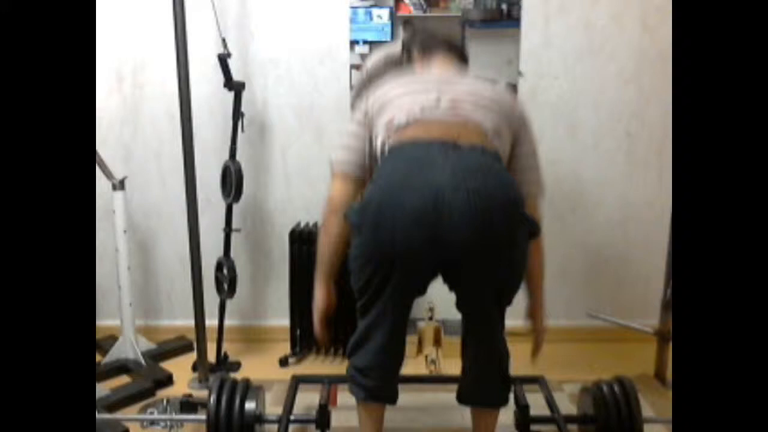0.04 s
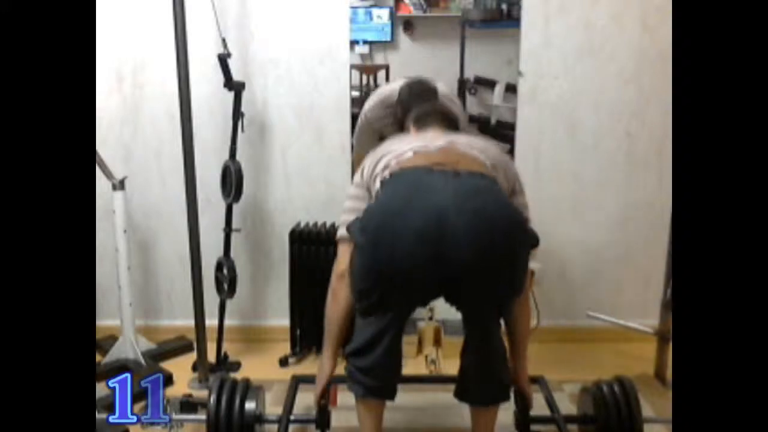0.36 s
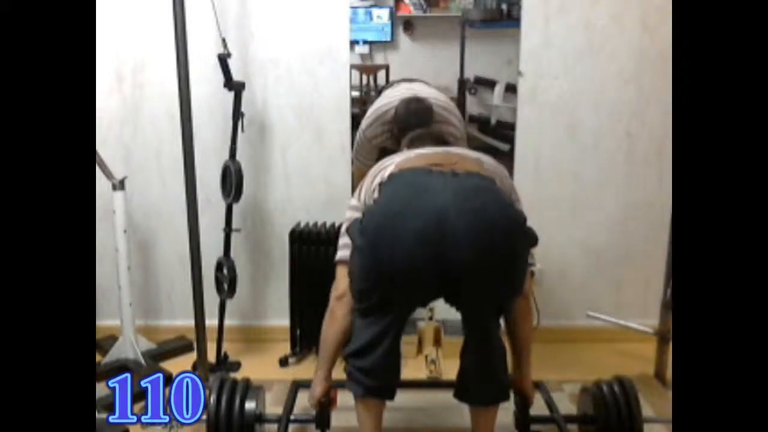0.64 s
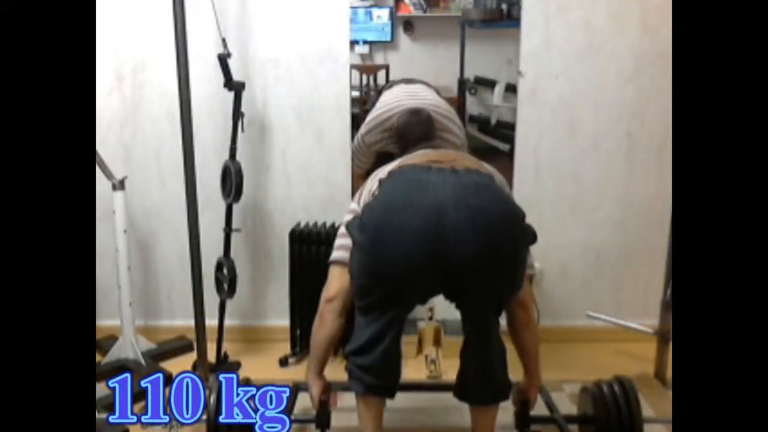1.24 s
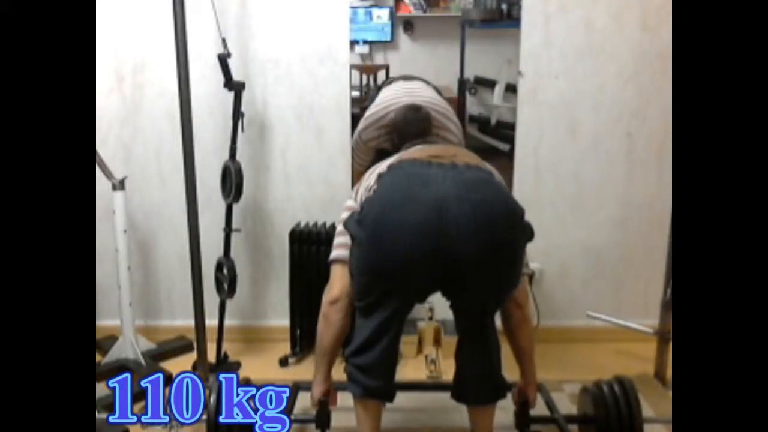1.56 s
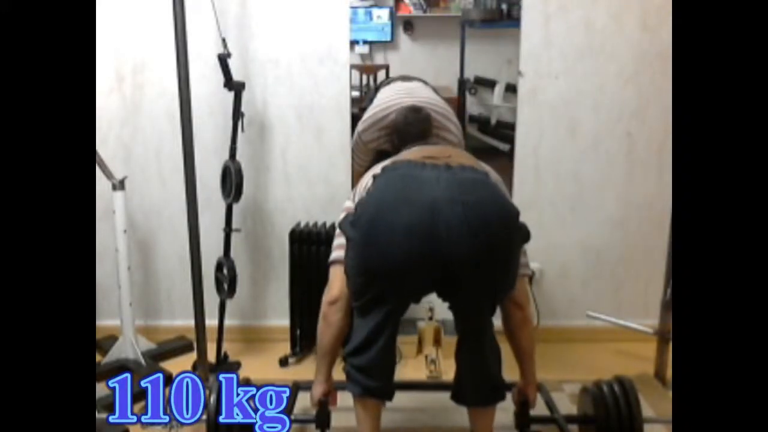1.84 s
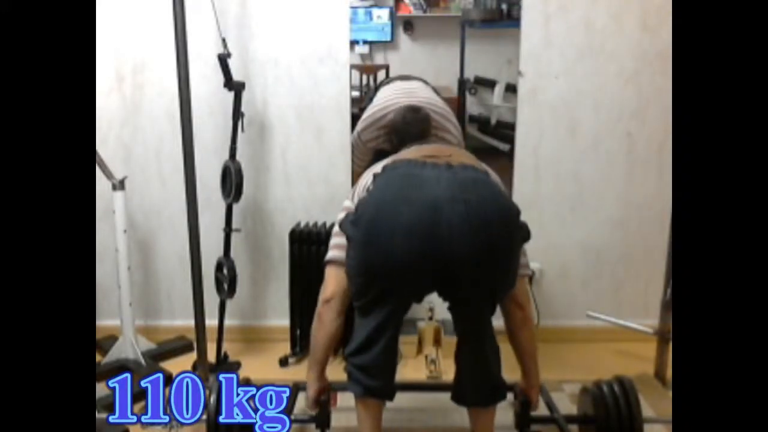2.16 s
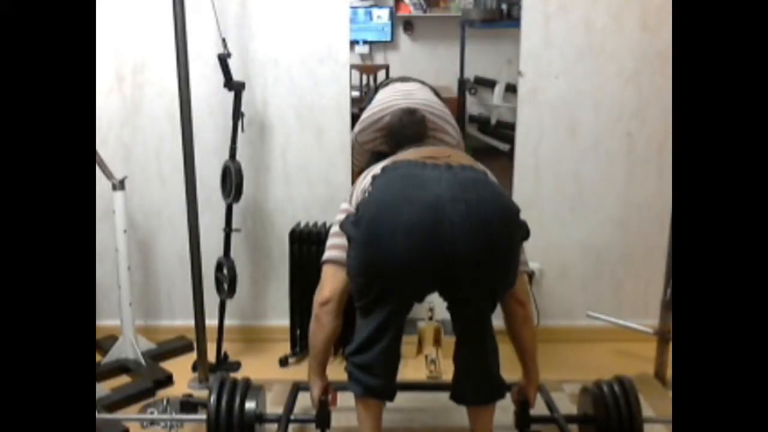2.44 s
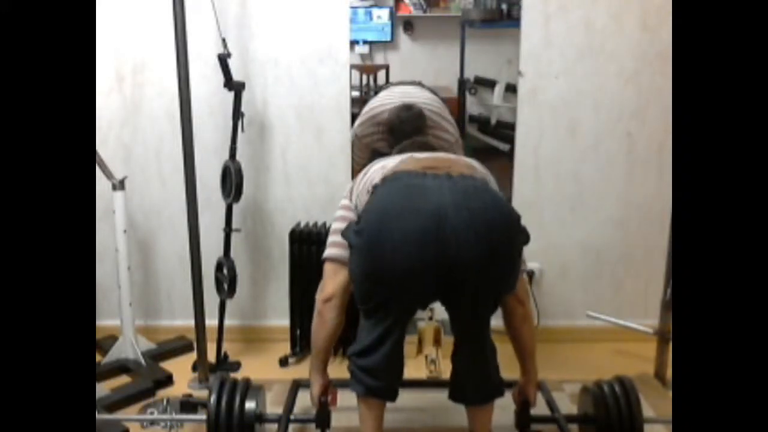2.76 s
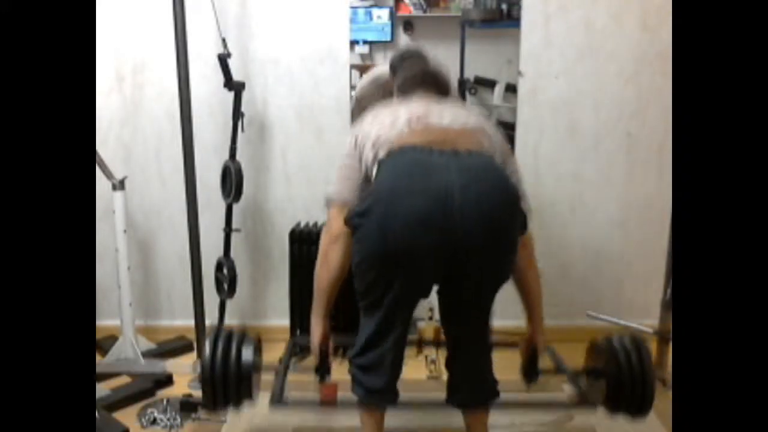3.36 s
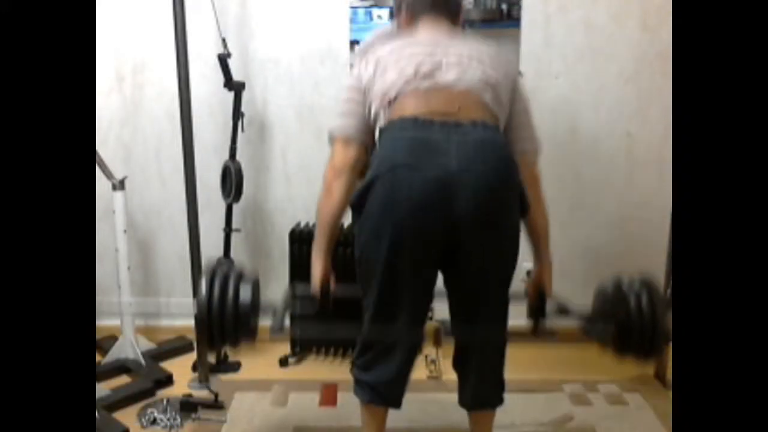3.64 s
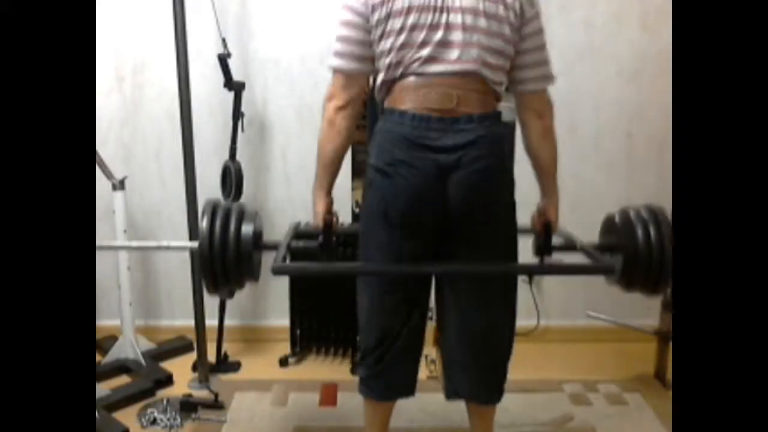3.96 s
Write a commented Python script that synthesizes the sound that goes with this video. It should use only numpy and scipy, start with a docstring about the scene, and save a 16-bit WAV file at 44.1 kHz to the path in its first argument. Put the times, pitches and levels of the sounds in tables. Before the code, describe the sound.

A heavy barbell is pulled off the floor with a sharp clang of plates and a low thud, heard from behind the lifter in a small room. Quiet shuffling and fan hum precede it; light clicks follow the fading ring.

```python
"""A loaded steel barbell is pulled off the floor of a small home gym.
The slack snaps out in one quick cluster of knocks: plates and sleeves clang,
the unloaded floor thuds, the bar rings on. Before it the lifter shuffles into place;
after it come a few small dry clicks. A fan hums throughout; a low rumble swells now and then."""
import sys
import numpy as np
from scipy import signal
from scipy.fft import rfft, irfft
from scipy.io import wavfile
from scipy.ndimage import uniform_filter1d, minimum_filter1d

SR = 44100
rng = np.random.default_rng(int(sys.argv[2]) if len(sys.argv) > 2 else 0)


def wrap_up_sound(samples):
    """Save the sound to the file named by the first command line argument, as 16-bit audio."""
    columns = np.atleast_2d(samples).T
    # keep every value between -1 and 1, then stretch to whole-number steps
    tamed = np.clip(columns, -1, 1)
    steps = np.round(tamed * 32767).astype(np.int16)
    wavfile.write(sys.argv[1], SR, steps)


N = 176400
T = np.arange(N) / SR

# fan air noise: freq_hz, density_db
AIR_SPECTRUM = [(20, 4.5), (45, -10.5), (62, -20), (80, -14.5), (120, -7), (200, -6.5), (300, -3),
                (400, -8.5), (510, -16), (580, -12), (770, -9), (1000, -19.5), (1400, -17), (1700, -21.5),
                (3200, -28.5), (4800, -32), (6900, -33.5), (8200, -42), (9500, -46.5), (15500, -48.5)]
# fan hum lines: pitch_hz, level_db, waver_ratio
HUM_LINES = [(58, -55, 0.48), (99.6, -60.5, .8), (145.7, -57, 0.51), (184, -50.5, 0.58), (276, -58.5, 0.89),
             (737, -53.5, 0.88)]
# swells of low hum and rumble: centre_s, length_s, level_db
RUMBLE_EVENTS = [(0.253, 0.41, -43), (0.493, .14, -40.5), (2.432, 0.33, -40.5), (2.98, 0.15, -36.5),
                 (3.23, 0.12, -38)]
# low hum and rumble: freq_hz, density_db
RUMBLE_SPECTRUM = [(10, 6), (25, 5), (40, -2), (60, -0.5), (90, -37), (300, -77.5)]
# feet and clothes: centre_s, length_s, thump_hz, thump_db, swish_db
SHUFFLE_EVENTS = [(0.53, 0.18, 112, -40.5, -63), (0.703, 0.21, 140, -50.5, -65),
                  (.98, 0.2, 158, -42.5, -61.5), (1.22, 0.16, 105, -47.5, -68),
                  (2.282, 0.16, 115, -46, -63), (2.523, 0.17, 120, -43.5, -70)]
# foot thump: pitch_ratio, density_db
THUMP_SPECTRUM = [(.5, -13), (.75, -10), (1, 2.5), (1.3, -4), (2.2, -16.5), (4, -24), (10, -42), (35, -68)]
# cloth swish: freq_hz, density_db
SWISH_SPECTRUM = [(1000, -20), (3500, -9), (4800, -2), (6600, 0), (7800, -7), (9500, -17), (15000, -32)]
# plate and sleeve knocks: start_s, gain_db, darkening_db_per_octave, sharpness_db
KNOCK_EVENTS = [(3.0136, -10, 4.5, -8), (3.0176, 3, -4, -7), (3.0276, 2.5, 0.5, -4), (3.0342, -0.5, 1, -1),
                (3.038, 3.5, 3, 6), (3.044, 3, -1, 6), (3.048, 0.5, -1.5, 5), (3.056, 1.5, 3, -2),
                (3.074, -6.5, 10.5, 3), (3.092, -7, -1, 4)]
# crash of countless small modes: freq_hz, density_db
CRASH_SPECTRUM = [(40, -20), (200, -4), (360, -9.5), (480, -6), (620, -8.5), (850, 1), (1020, -4),
                  (1300, 2.5), (1650, -3), (2400, 0.5), (3700, -2), (4300, -2), (5200, 0), (6250, -4),
                  (7200, -10.5), (8000, -20), (9200, -32.5), (12000, -49), (15500, -54)]
# iron plates: pitch_hz, gain_db, t60_s
PLATE_MODES = [(795, -5, .3), (1176, 1, .28), (1285, 1, .32), (1349, -1, .26), (1800, -1, .28),
               (1979, -1, .32), (2157, -3, .42), (2431, -1, .32), (2661, -3, .28), (2733, -3, .38),
               (3352, -3, .27), (3931, -3, .31), (6077, 2, .24), (6135, 1, .24)]
# steel bar, close pairs beat: pitch_hz, gain_db, t60_s
BAR_MODES = [(952, -3, .52), (1446, -5, .92), (1540.5, 1, .55), (2957, -9, .33), (3402, -24, .8),
             (4746, -10, .22), (5958, -12, 1.6), (5966.3, -12, .75), (5973, -21, 1.7), (6261, -9, .3),
             (7380, -8, .22), (9862, -46, 1.2)]
# sleeves and collars: pitch_hz, gain_db, t60_s
SLEEVE_MODES = [(470, -5, .28), (850, 0, .3), (1121, -1, .26), (2254, -2, .3), (2383, -1, .25),
                (2892, -1, .27), (3194, -1, .3), (3668, 1, .28), (4960, -3, .22), (5439, 0, .28),
                (5816, -1, .22), (6654, -6, .28), (8250, -17, .2)]
# room reverberation: freq_hz, t60_s
ROOM_DECAY = [(100, .42), (500, 0.42), (1500, 0.38), (3000, 0.39), (6000, 0.31), (9000, 0.31),
              (15000, 0.17)]
# floor under the load: pitch_hz, gain_db, t60_s
FLOOR_MODES = [(27.1, -16, 1), (59.5, -0.5, .42), (113.2, -4.5, 0.46), (153.1, -1, 0.28)]
# dry clicks: start_s, gain_db
CLICK_EVENTS = [(3.571, -1), (3.6726, -16), (3.6972, 0), (3.9802, -2)]
# click ring: pitch_hz, gain_db, t60_s
CLICK_RING_MODES = [(2490, -7, .02), (2820, 0, 0.018), (6390, -24, 0.079), (6660, -4, 0.022),
                    (7000, -20, 0.022)]
# click snap: freq_hz, density_db
SNAP_SPECTRUM = [(1500, -6), (2800, -11), (3400, -7.5), (5500, -7), (6800, 5), (7400, -2), (8200, -9),
                 (9000, -22), (11000, -23), (15000, -36)]
# nearest walls: delay_s, gain_db
WALL_ECHOES = [(.0105, -11), (.034, -12)]


def amp(db):
    return 10 ** (np.asarray(db) / 20)


def unit_rms(x):
    return x / np.sqrt(np.mean(x ** 2) + 1e-20)


def lookup(table, hz):
    """Interpolates on a log-frequency axis."""
    freq_hz, value = np.transpose(table)
    return np.interp(np.log(hz + 1), np.log(freq_hz + 1), value)


def decay(t, t60_s):
    """Falls 60 dB in t60_s; zero before t = 0."""
    return (t >= 0) * np.exp(-np.log(1000) * np.maximum(t, 0) / t60_s)


def swell(centre_s, length_s):
    """Gaussian rise and fall."""
    return np.exp(-(2 * (T - centre_s) / length_s) ** 2)


def colour(x, spectrum, dark_db_per_octave=0):
    """Minimum-phase filter of unit power, tilted above 1 kHz."""
    hz = abs(np.fft.fftfreq(4096, 1 / SR))
    tilt_db = dark_db_per_octave * np.log2(np.maximum(hz, 1000) / 3000)
    gain = unit_rms(amp(lookup(spectrum, hz) - tilt_db))
    log_response = np.conj(signal.hilbert(np.log(gain + 1e-6)))
    taps = np.fft.ifft(np.exp(log_response)).real
    return signal.oaconvolve(x, taps[:len(taps) // 2])[:len(x)]


def noise(spectrum):
    """Steady shaped noise, rms 1."""
    gain = amp(lookup(spectrum, np.fft.rfftfreq(N, 1 / SR)))
    return unit_rms(irfft(rfft(rng.standard_normal(N)) * gain, N))


def drift(cutoff_hz):
    """Slow random motion, rms 1."""
    hz = np.fft.rfftfreq(2048, 4 / 2048)
    slow = irfft(rfft(rng.standard_normal(2048)) / (1 + (hz / cutoff_hz) ** 4))
    return np.interp(T, np.linspace(0, T[-1], len(slow)), unit_rms(slow))


def fan(air_db=-44.5, flicker_db=1.16, waver_hz=11.7):
    """A faintly flickering rush of air plus wavering hum lines."""
    bands = signal.stft(noise(AIR_SPECTRUM), nperseg=1024)[2]
    patches = uniform_filter1d(rng.standard_normal(bands.shape), size=10, axis=0)
    patches = unit_rms(uniform_filter1d(patches, size=8, axis=1))
    air = signal.istft(bands * amp(flicker_db * patches), nperseg=1024)[1][:N]
    out = amp(air_db) * unit_rms(air)
    for pitch_hz, level_db, waver_ratio in HUM_LINES:
        waver = 1 + waver_ratio * (drift(waver_hz) + 1j * drift(waver_hz))
        out += amp(level_db) * unit_rms((waver * np.exp(2j * np.pi * pitch_hz * T)).real)
    return out


def rumble():
    """Low hum and rumble swelling now and then."""
    level = sum(amp(db) * swell(centre_s, length_s) for centre_s, length_s, db in RUMBLE_EVENTS)
    return level * noise(RUMBLE_SPECTRUM)


def lifter():
    """Feet thump softly, cloth swishes."""
    thumps, swish_level = np.zeros(N), np.zeros(N)
    for centre_s, length_s, thump_hz, thump_db, swish_db in SHUFFLE_EVENTS:
        envelope = swell(centre_s, length_s)
        spectrum = [(thump_hz * ratio, db) for ratio, db in THUMP_SPECTRUM]
        thumps += amp(thump_db) * envelope * noise(spectrum)
        swish_level += amp(swish_db) * envelope
    return thumps + swish_level * noise(SWISH_SPECTRUM) * amp(1.5 * drift(cutoff_hz=30))


def ring(modes, power, wander_hz):
    """Modes store the power fed in and decay; loose contact makes their pitch wander."""
    out = np.zeros(N)
    struck = np.cumsum(power) > .001
    for pitch_hz, gain_db, t60_s in modes:
        retention = np.exp(-2 * np.log(1000) / (t60_s * SR))
        energy = signal.lfilter([1], [1, -retention], power)
        cycles = np.cumsum(struck * (pitch_hz + wander_hz * drift(cutoff_hz=45))) / SR
        out += amp(gain_db) * np.sqrt(2 * energy) * np.sin(2 * np.pi * cycles)
    return out


def barbell(rise_s=.00067, contact_s=.0012, crash_t60_s=.12, bar_build_s=.03):
    """Each knock is a hard contact and a short crash, and feeds plate, bar and sleeve modes."""
    crash, power = np.zeros(N), np.zeros(N)
    for start_s, gain_db, dark_db_per_octave, sharpness_db in KNOCK_EVENTS:
        t = T - start_s
        contact = (t >= 0) * np.exp(-np.maximum(t, 0) / contact_s)
        envelope = np.clip(t / rise_s, 0, 1) * (decay(t, crash_t60_s) + amp(sharpness_db) * contact)
        burst = rng.standard_normal(N) * envelope / np.linalg.norm(envelope)
        crash += amp(gain_db) * colour(burst, CRASH_SPECTRUM, dark_db_per_octave)
        power += amp(gain_db) ** 2 * contact / contact.sum()
    power /= power.sum()
    pole = np.exp(-1 / (bar_build_s * SR))
    bar_power = signal.lfilter([1 - pole], [1, -pole], power)  # the long bar rings up slowly
    plates = amp(-23) * ring(PLATE_MODES, power, wander_hz=10.3)
    bar = amp(-25.5) * ring(BAR_MODES, bar_power, wander_hz=.89)
    sleeves = amp(-31.5) * ring(SLEEVE_MODES, power, wander_hz=10.3)
    return amp(6.5) * (crash + amp(-1) * room(crash)) + plates + bar + sleeves


def room(x, gap_s=.0035):
    """Dense reflections, each band decaying at its own rate."""
    taps = rng.standard_normal(SR) * (rng.random(SR) < .15) * (T[:SR] > gap_s)
    hz, t, bands = signal.stft(taps, SR, nperseg=256)
    t60_s = lookup(ROOM_DECAY, hz)[:, None]
    tail = signal.istft(bands * decay(t, t60_s), SR, nperseg=256)[1]
    return signal.fftconvolve(x, tail / np.linalg.norm(tail))[:N]


def floor_thud(start_s=3.016, rise_s=.019):
    """The floor springs back as the load leaves it."""
    push = swell(start_s + rise_s / 2, rise_s)
    return amp(-21) * ring(FLOOR_MODES, push / push.sum(), wander_hz=4)


def clicks(snap_t60_s=.027, ring_rise_s=.0031):
    """Each click is a very short ring and a bright snap that the room reflects."""
    snaps, rings = np.zeros(N), np.zeros(N)
    for start_s, gain_db in CLICK_EVENTS:
        t = T - start_s
        envelope = decay(t, snap_t60_s)
        snaps += amp(gain_db) * rng.standard_normal(N) * envelope / np.linalg.norm(envelope)
        for pitch_hz, mode_db, t60_s in CLICK_RING_MODES:
            level = np.clip(t / ring_rise_s, 0, 1) * decay(np.maximum(t - ring_rise_s, 0), t60_s)
            rings += amp(gain_db + mode_db) * level * np.sin(2 * np.pi * (pitch_hz * t + rng.random()))
    snaps = amp(-19) * colour(snaps, SNAP_SPECTRUM)
    echoes = sum(amp(db) * np.roll(snaps, round(delay_s * SR)) for delay_s, db in WALL_ECHOES)
    return amp(-37.5) * rings + snaps + echoes + amp(.5) * room(snaps)


def scene():
    """Mono mix, heard from behind the lifter."""
    return (fan() + lifter() + rumble() + barbell() + floor_thud() + clicks())[None]


def record(dry):
    """Brief opening silence, peak limiter, low-pass."""
    start_s, ceiling, limiter_s, cutoff_hz = .165, .95, .003, 15680
    gated = dry * (T >= start_s)
    width = int(limiter_s * SR)
    gain = ceiling / np.maximum(abs(gated), ceiling)
    gain = uniform_filter1d(minimum_filter1d(gain, width), width)
    lowpass = signal.firwin(511, cutoff_hz, window=("kaiser", 9), fs=SR)
    return signal.oaconvolve(gated * gain, lowpass[None], "same")


dry = scene()
out = record(dry)
wrap_up_sound(out)
```